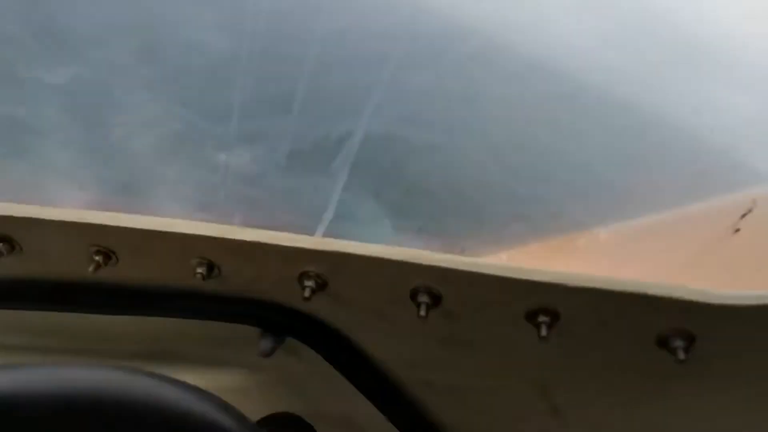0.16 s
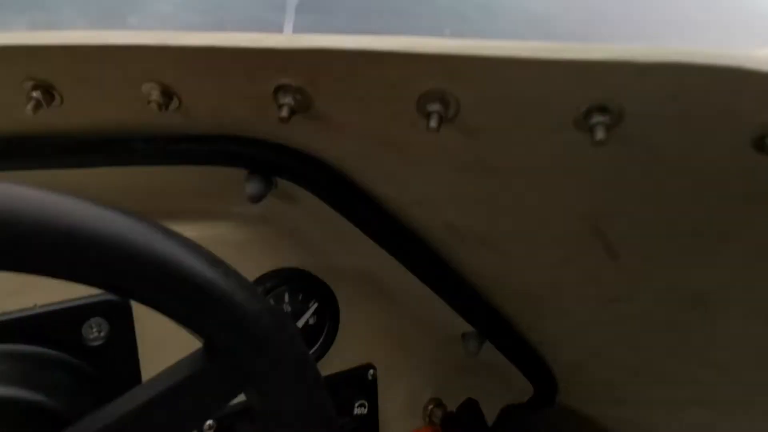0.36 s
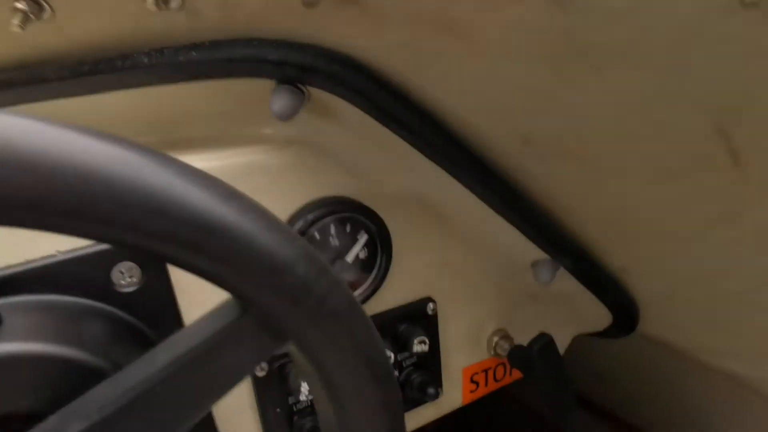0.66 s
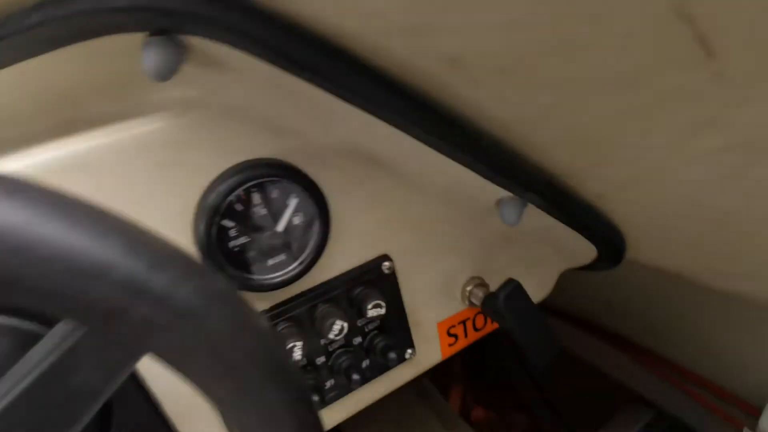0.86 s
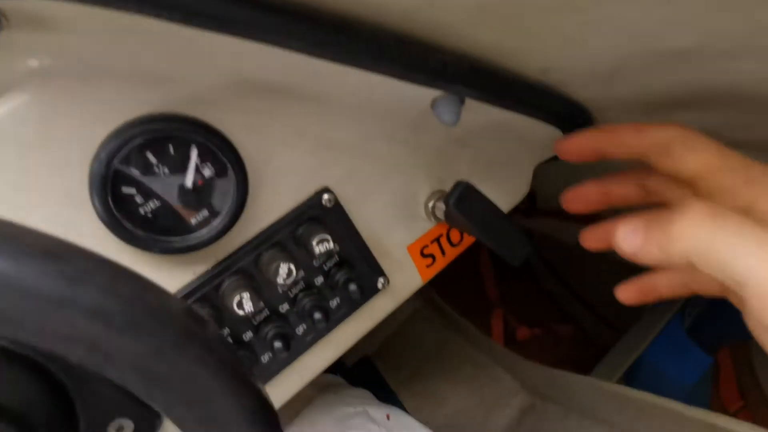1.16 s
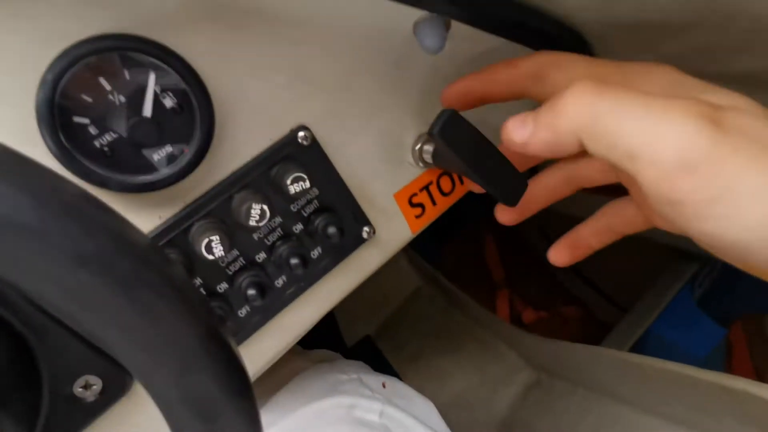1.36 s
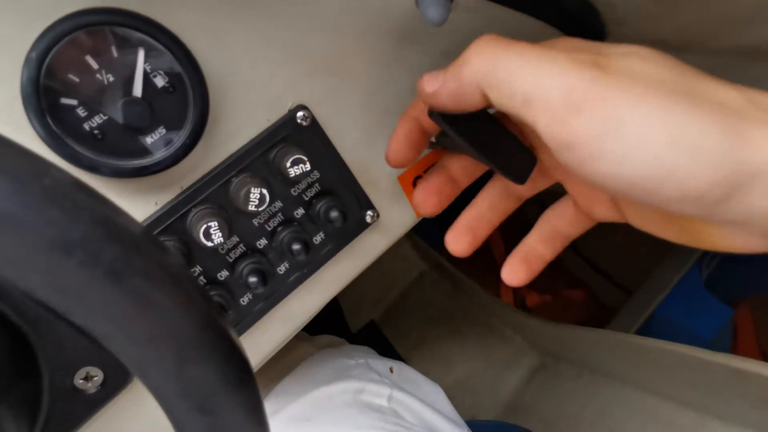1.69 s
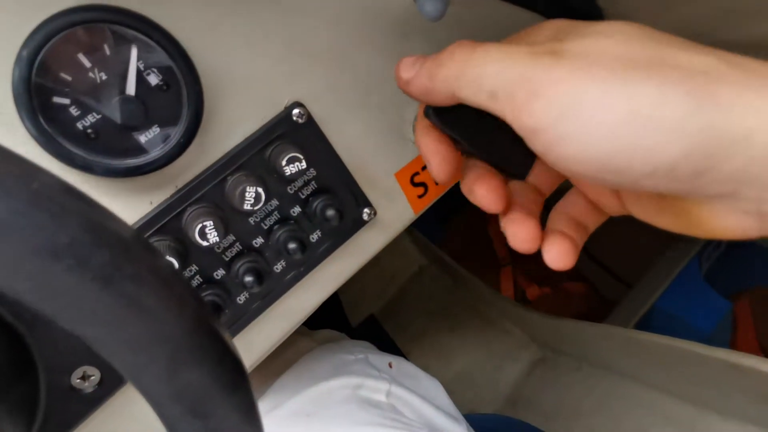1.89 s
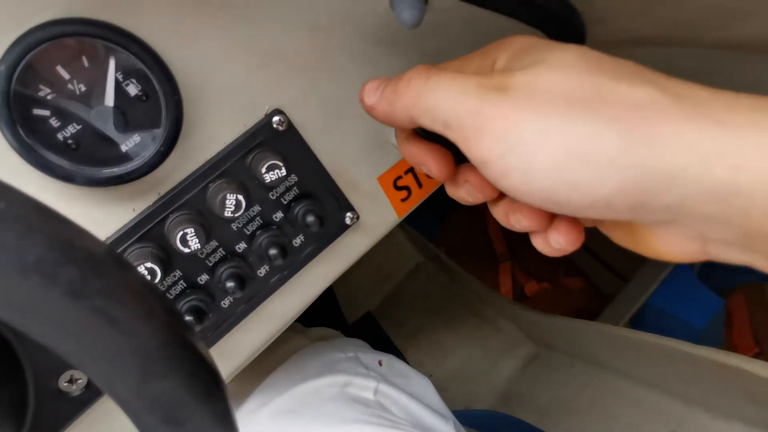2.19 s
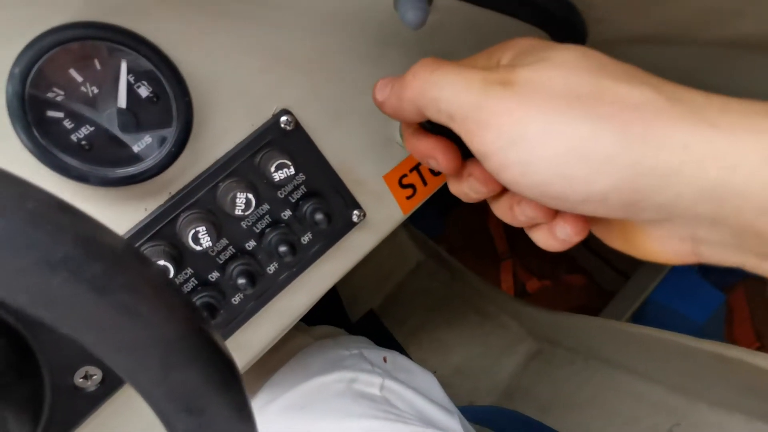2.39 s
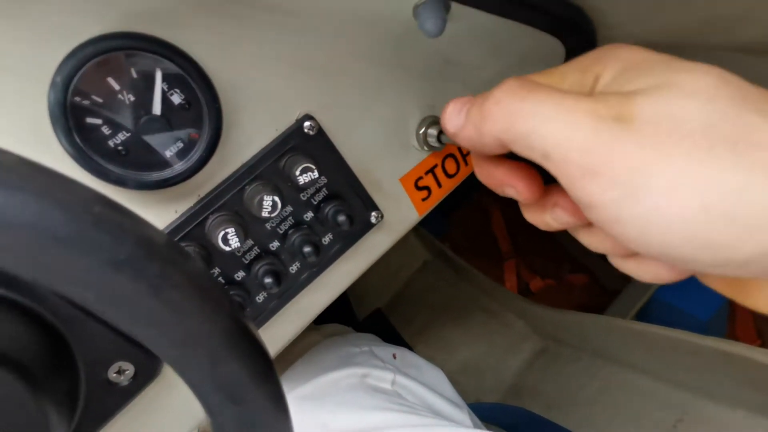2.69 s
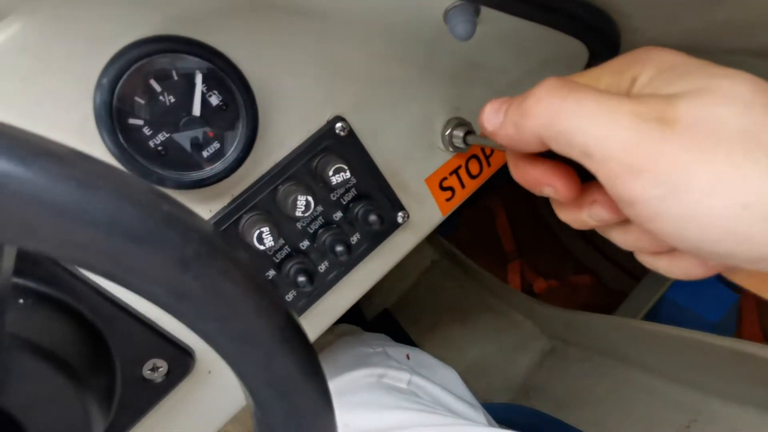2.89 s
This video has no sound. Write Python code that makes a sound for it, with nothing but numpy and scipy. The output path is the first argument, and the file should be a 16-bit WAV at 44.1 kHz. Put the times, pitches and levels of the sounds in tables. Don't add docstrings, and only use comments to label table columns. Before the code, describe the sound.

A small diesel engine idles under the floor of a closed boat cabin: a constant deep boom near 77 Hz, broad low rumble and muted mechanical clatter with a soft hiss. Faint brushing at 0.15 s, a firmer brush at 1.6, and small metallic ticks at 1.74 and 2.14 are mostly buried. From 2.75 s the engine sags, its boom swells briefly around 2.84, then drops; rumble and weaker clatter remain until 3.05.

```python
import sys
import numpy as np
from scipy import signal
from scipy.fft import rfft, irfft
from scipy.io import wavfile

SR = 44100
rng = np.random.default_rng(int(sys.argv[2]) if len(sys.argv) > 2 else 0)


def materialize(psi):
    bounded = np.clip(np.atleast_2d(psi).T, -1, 1)
    quanta = np.round(bounded * 32767).astype(np.int16)
    wavfile.write(sys.argv[1], SR, quanta)


def natural_amplitude(level_db):
    exponent = np.asarray(level_db, float) / 20
    return 10 ** exponent


N = 134505


def rms_one(x):
    return x / np.sqrt(np.mean(x ** 2) + 1e-20)


def in_time(rows):
    s, *columns = np.transpose(rows)
    return [np.interp(np.arange(N) / SR, s, column) for column in columns]


def at_hz(points, hz):
    table_hz, values = np.transpose(points)
    return np.interp(np.log(hz), np.log(table_hz + 1), values)


def drift(rate):
    r = np.exp(-80 * np.pi * rate / SR)
    noise = rng.standard_normal(N // 40 + 2002)
    slow = signal.lfilter([1], [1, -2 * r, r * r], noise)[2000:]
    return np.interp(np.arange(N) / 40, np.arange(len(slow)), rms_one(slow - slow.mean()))


def resonate(x, hz, width):
    r = np.exp(-np.pi * width / SR)
    return signal.lfilter([1, 0, -1], [1, -2 * r * np.cos(2 * np.pi * hz / SR), r * r], x)


def stereo(mid, side, hz):
    # (frequency [Hz], left-right likeness [-1 to 1])
    likeness = [(30, .995), (80, 0.93), (150, .9), (300, 0.72), (600, 0.29), (1200, -0.15), (4000, 0.041),
                (12000, 0.013)]
    # (frequency [Hz], left over right [dB])
    tilt = [(60, -0.5), (130, 0.3), (290, -3.3), (640, -1), (1410, .3), (3100, 1), (15000, -4)]
    alike = np.clip(at_hz(likeness, hz), -1, 1)
    both = np.sqrt(1 + alike) * mid + np.sqrt(1 - alike) * side * [[1], [-1]]
    return both * natural_amplitude(at_hz(tilt, hz) * np.array([[.5], [-.5]]))


def banded_noise(spectrum, patchy_db):
    lowest, highest = spectrum[0][0], spectrum[-1][0]
    corners = lowest * 2 ** np.arange(0, np.log2(highest / lowest) + .1, 1 / 3)
    together = drift(3.0)
    white = rng.standard_normal((2, 2, N + 8000))
    out = 0
    for k, (low, high) in enumerate(zip(corners, corners[1:])):
        band = signal.butter(2, [low, high], "band", fs=SR, output="sos")
        mid, side = signal.sosfilt(band, white[k % 2])[:, 8000:]
        hz = np.sqrt(low * high)
        patches_db = patchy_db * (0.84 * together + drift(3.0))
        out = out + natural_amplitude(at_hz(spectrum, hz) + patches_db) * stereo(mid, side, hz)
    return rms_one(out)


def firing_angle(hz):
    first_firing_s = .0047
    return 2 * np.pi * (np.cumsum(hz / 3) / SR - first_firing_s * hz[0] / 3)


def rumble():
    # (frequency [Hz], density [dB per Hz])
    spectrum = [(20, -4), (40, -2), (62, -8.5), (110, -9), (190, -8), (300, -10.5), (420, -19),
                (600, -25.5)]
    return natural_amplitude(-23) * banded_noise(spectrum, patchy_db=.4)


def hand():
    # (time [s], level [dB], length [s], frequency [Hz], left over right [dB])
    touches = [
        (.14, -43, .02, 4000, 0),
        (.165, -39, .04, 4000, 0),
        (1.577, -32, .036, 3500, -2),
        (1.742, -31, .005, 7400, 6),
        (1.742, -37, .006, 4300, -4),
        (2.138, -35, .006, 6900, 4),
        (2.139, -35, .006, 4500, -4),
        (2.777, -45, .005, 9000, 0),
    ]
    t = np.arange(N) / SR
    out = np.zeros((2, N))
    for s, db, length, hz, pan_db in touches:
        onset = np.clip((t - s) / .002, 0, 1)
        decay = np.exp(-(np.maximum(t - s, 0) / length) ** 2)
        width = min(40 * length, 1.3) * hz
        noise = rms_one(resonate(rng.standard_normal((2, N)), hz, width))
        out += natural_amplitude(db + pan_db * np.array([[.5], [-.5]])) * onset * decay * noise
    return out


def clatter(angle):
    # (frequency [Hz], density [dB per Hz])
    spectrum = [(450, 2), (560, -10), (700, -0.5), (1100, -3.5), (1450, -8.5), (2500, -12), (4600, -17.5),
                (16500, -29.5)]
    # (frequency [Hz], width [Hz], level [dB])
    panels = [(337, 24, -41.5), (409, 23, -39.5), (685.7, 42, -42.5), (820, 71, -46), (1131, 8.2, -46),
              (1680, 20, -51), (1717, 22, -56), (2000, 5.3, -51), (3463, 40, -62.5), (4570, 300, -54.5),
              (6690, 47, -63.5), (7570, 80, -63)]
    # (time [s], level [dB])
    effort = [(0, .5), (.17, 1.5), (.3, 0), (1.2, 0), (1.5, -.7), (2.25, .7), (2.66, -.5), (2.8, -3),
              (2.92, -5.5), (2.98, -4.5), (3.05, -4)]
    cycle_db, firing_db, cycle_lag_rad = 0.62, 0.3, 3.1

    throb = natural_amplitude(cycle_db * np.cos(angle / 3 - cycle_lag_rad) + firing_db * np.cos(angle))
    gear = natural_amplitude(-29.5) * banded_noise(spectrum, patchy_db=.45)
    for hz, width, db in panels:
        mid, side = rms_one(resonate(rng.standard_normal((2, N)), hz, width))
        gear = gear + natural_amplitude(db) * stereo(mid, side, hz)
    gear = throb * gear

    effort_db, = in_time(effort)
    hiss = signal.sosfilt(signal.butter(1, 5000, "high", fs=SR, output="sos"), gear)
    return natural_amplitude(effort_db) * (gear + (natural_amplitude(.8 * effort_db) - 1) * hiss)


def hum(angle, hz, boom_db):
    # (multiple, level below the boom [dB])
    orders = [(1, -14.5), (2, -18.5), (3, 0), (4, -15.5), (5, -17), (6, -20.5), (7, -16), (8, -33.5),
              (9, -25.5), (10, -27.5), (11, -32), (12, -28), (13, -43.5)]
    against = (3, 7, 9, 11)
    # (thirds of the firing rate, level below the boom [dB])
    uneven = [(4, -23), (13, -29), (16, -26), (19, -30), (20, -24), (25, -28), (28, -28), (35, -29),
              (40, -30)]
    # (multiple, level change [dB per s])
    lean = [(5, 2), (6, -4.5), (7, 2), (12, 6.25)]
    steady_boom_db, wander_db, wander_rad, wander_hz = -8, .6, .08, 3
    fuel_cut_s, fuel_fade_s, unfired_db = 2.75, .07, -9
    sag_per_s = 1.0
    cabin_hz, cabin_width_hz, cabin_peak_db = 141, 11, 23
    ear_lag_s, low_side_db = .0001, -24
    left_right = np.array([[1], [-1]])

    t = np.arange(N) / SR
    late = np.maximum(t - fuel_cut_s, 0)
    fuel_db = unfired_db * np.minimum(late / fuel_fade_s, 1)
    shaft_hz = np.where(late > 0, hz[int(fuel_cut_s * SR)] * (1 - sag_per_s * late), hz)
    shaft = firing_angle(shaft_hz)

    lines = [(k, db, 0 if round(k) in against else np.pi) for k, db in orders]
    lines += [(round(thirds) / 3, db, rng.uniform(0, 2 * np.pi)) for thirds, db in uneven]
    lean_db_per_s = {round(k): slope for k, slope in lean}
    out = 0
    for k, db, start in lines:
        loose = np.sqrt(k / 3) if k != 3 else .25
        if k == 3:
            level, line_angle = boom_db, angle
        else:
            fuel_share = 1 if 1.5 < k < 7.5 else .9
            level = steady_boom_db + db + fuel_db * fuel_share + lean_db_per_s.get(k, 0) * (t - 1.3)
            line_angle = shaft
        if k == 6:
            nearness = np.exp(-((k * shaft_hz / 3 - cabin_hz) / cabin_width_hz) ** 2)
            level = level + cabin_peak_db * nearness * (late > 0)
        turn = k * line_angle + start + wander_rad * loose * drift(wander_hz)
        lead = np.pi * ear_lag_s * k * hz / 3 * left_right
        balance = 1 + natural_amplitude(low_side_db) * loose * drift(wander_hz) * left_right
        level = level + wander_db * loose * drift(wander_hz)
        out = out + np.sqrt(2) * natural_amplitude(level) * balance * np.cos(turn - lead)
    return out


def scene():
    # (time [s], frequency [Hz], level [dB])
    boom = [(0, 76.72, -8), (1.3, 76.72, -8), (2.0, 76.8, -9), (2.4, 76.95, -8.5), (2.75, 76.7, -8),
            (2.79, 75, -6.5), (2.84, 71.9, -5), (2.88, 70.6, -6), (2.93, 74, -14), (2.965, 72.5, -13),
            (2.99, 67.5, -17), (3.02, 71, -12), (3.05, 71, -13)]
    hz, boom_db = in_time(boom)
    angle = firing_angle(hz)
    return rumble() + hand() + clatter(angle) + hum(angle, hz, boom_db)


def low_pass(x):
    return signal.sosfilt(signal.butter(12, 15740, fs=SR, output="sos"), x)


def record(dry):
    # (frequency [Hz], level [dB])
    left_port = [(4800, 0), (5300, -4.5), (6400, -4.5), (7600, -1.5), (8400, -6), (9400, -8), (9900, -16),
                 (15000, -14)]
    # (frequency [Hz], level [dB])
    right_port = [(4800, 0.5), (5500, -7.5), (6800, -5.5), (7900, -18), (10200, -18), (10700, -16.5),
                  (12700, -16.5), (15000, -19.5)]
    mirrored = np.concatenate([dry, dry[:, ::-1]], axis=1)
    hz = np.arange(N + 1) * SR / (2 * N) + 1
    port_db = np.array([at_hz(port, hz) - port[0][1] for port in (left_port, right_port)])
    wet = irfft(rfft(mirrored) * natural_amplitude(port_db))[:, :N]
    rounded = .98 * wet / (1 + wet ** 8) ** (1 / 8)
    return low_pass(rounded)


dry = scene()
out = record(dry)
materialize(out)
```